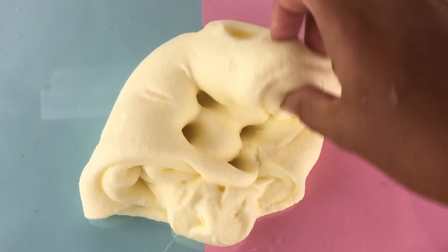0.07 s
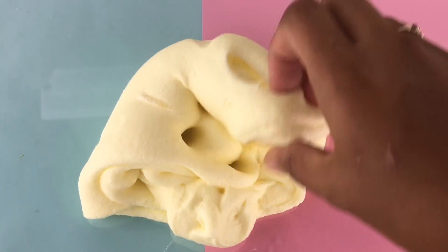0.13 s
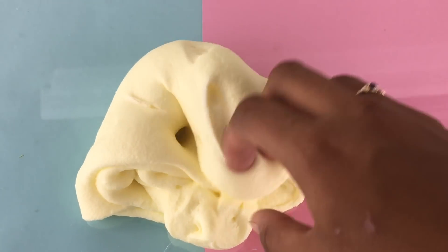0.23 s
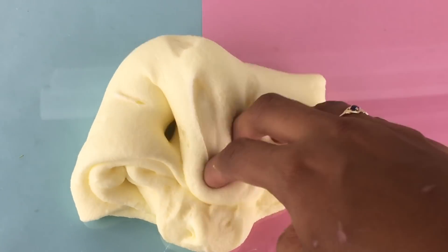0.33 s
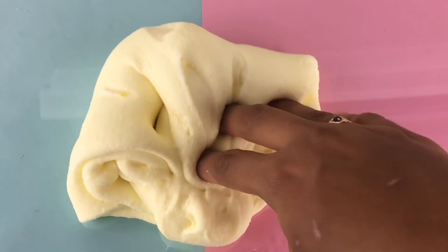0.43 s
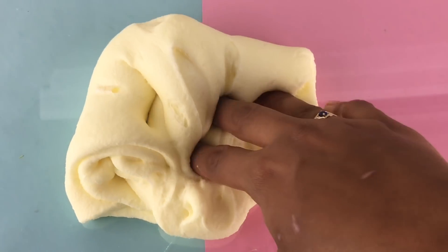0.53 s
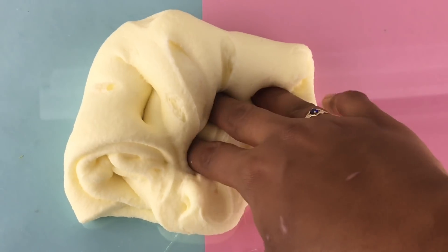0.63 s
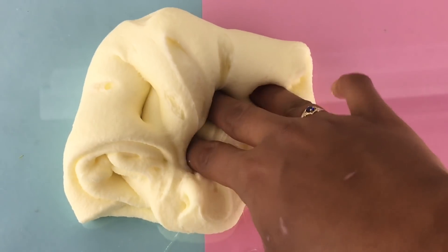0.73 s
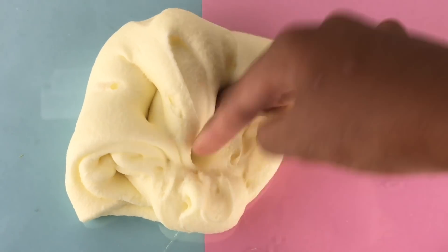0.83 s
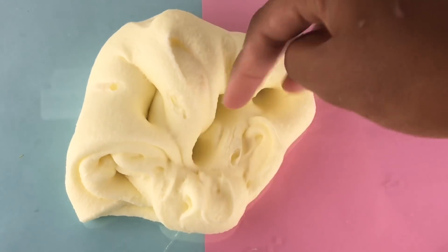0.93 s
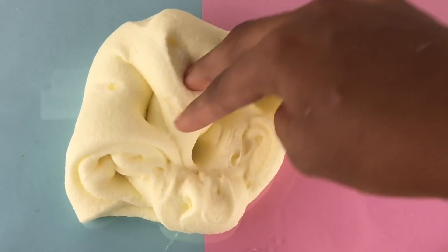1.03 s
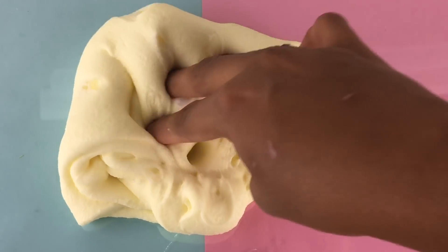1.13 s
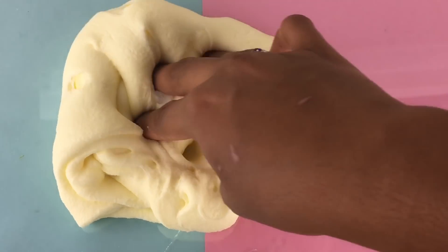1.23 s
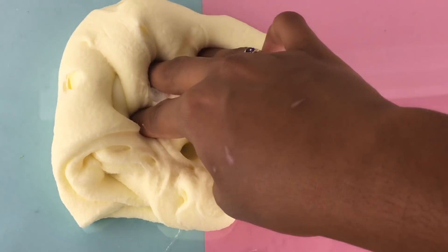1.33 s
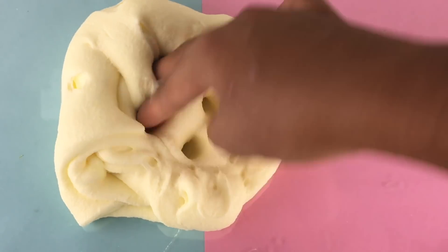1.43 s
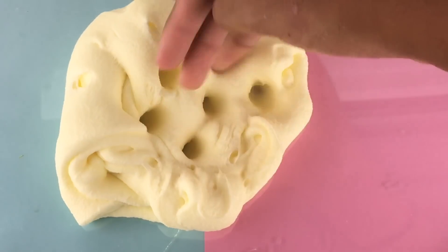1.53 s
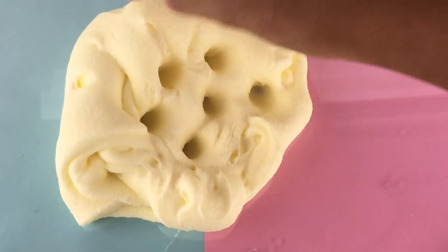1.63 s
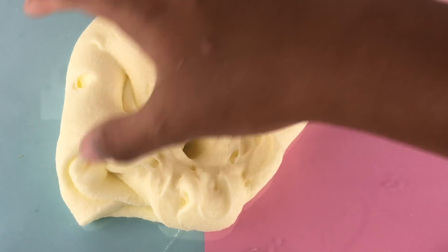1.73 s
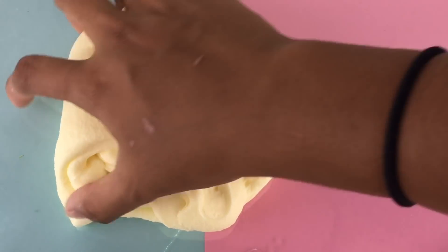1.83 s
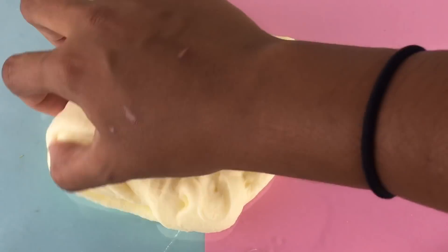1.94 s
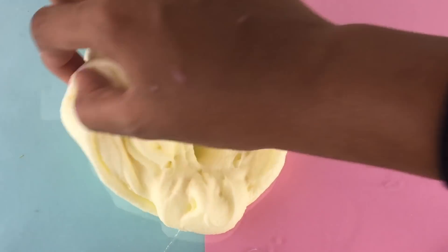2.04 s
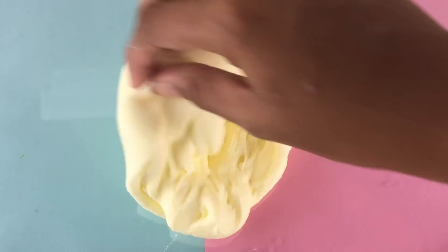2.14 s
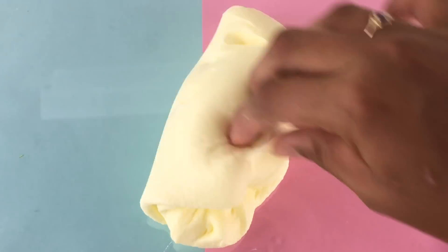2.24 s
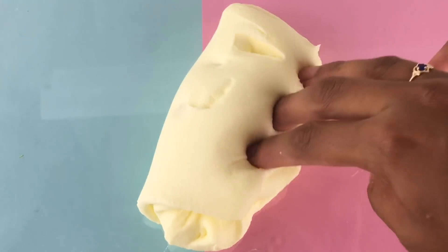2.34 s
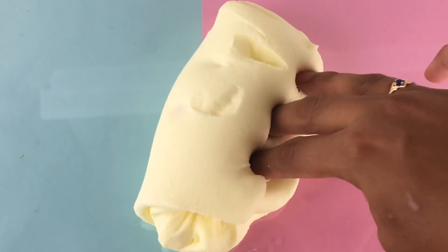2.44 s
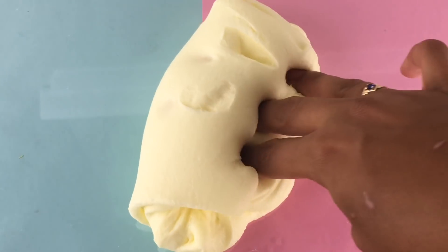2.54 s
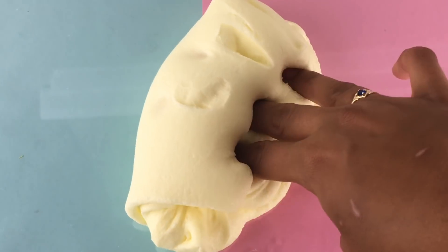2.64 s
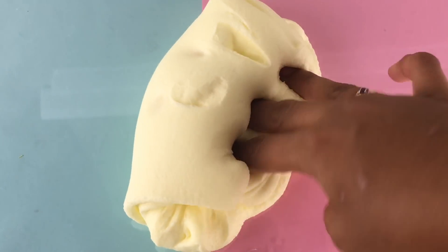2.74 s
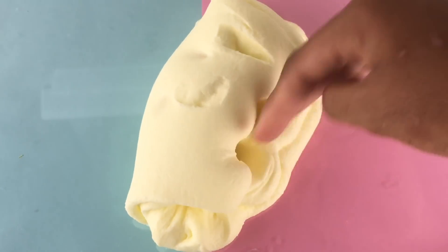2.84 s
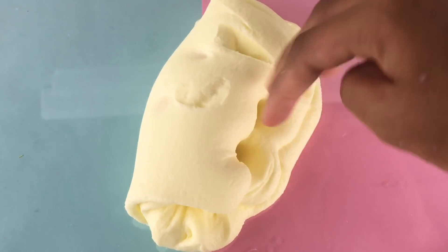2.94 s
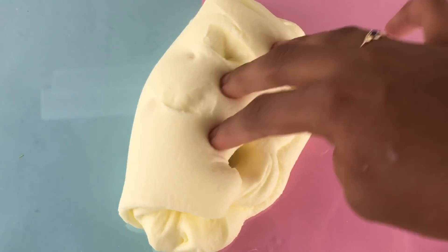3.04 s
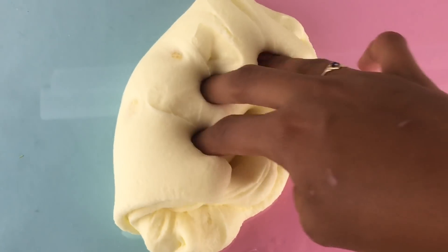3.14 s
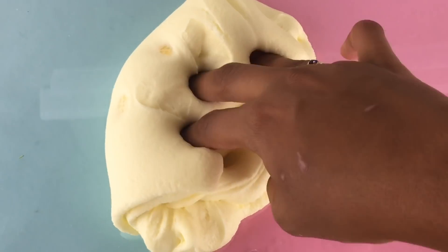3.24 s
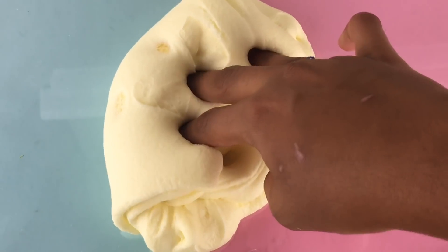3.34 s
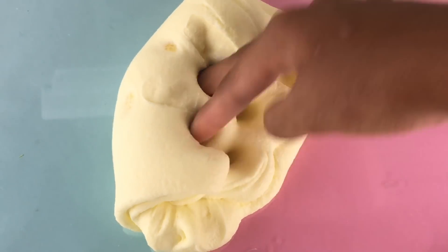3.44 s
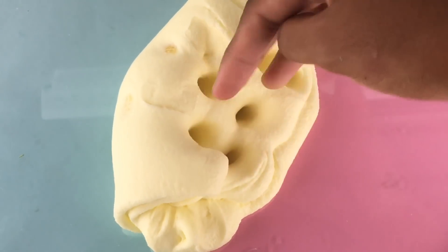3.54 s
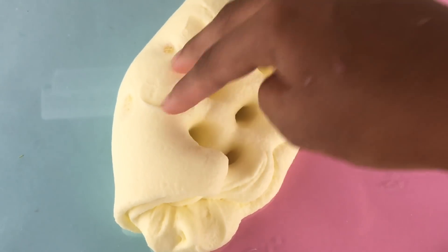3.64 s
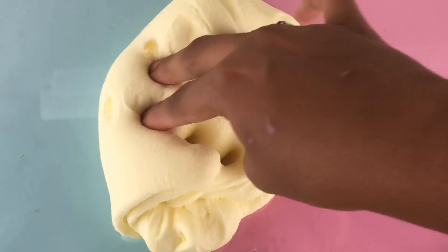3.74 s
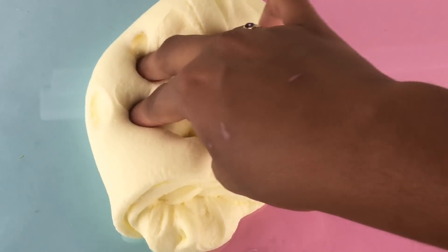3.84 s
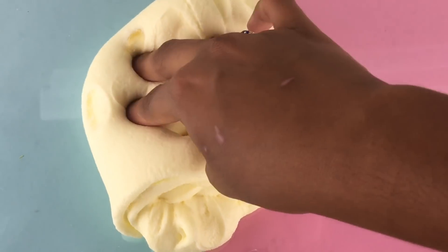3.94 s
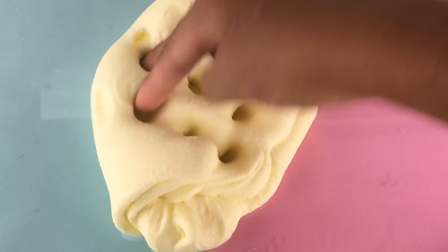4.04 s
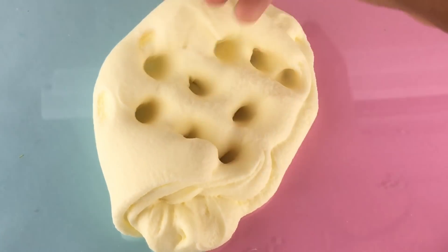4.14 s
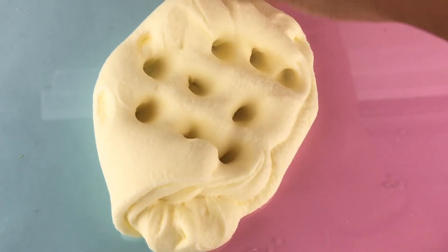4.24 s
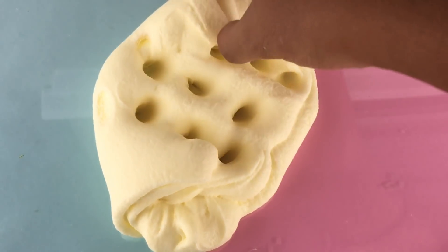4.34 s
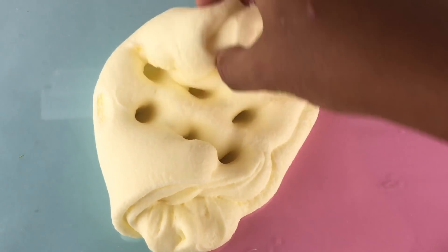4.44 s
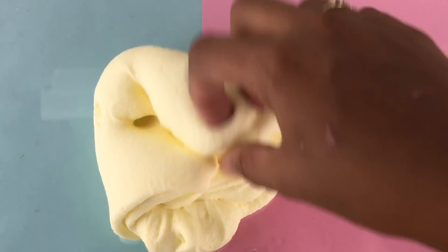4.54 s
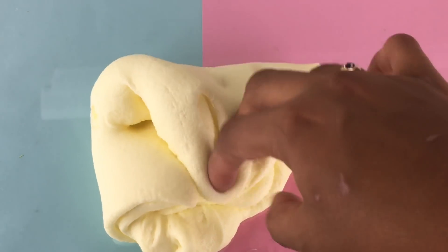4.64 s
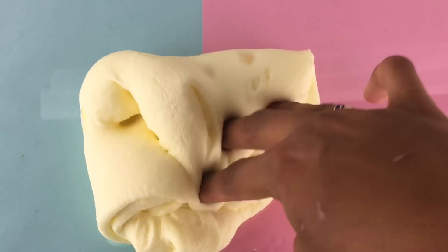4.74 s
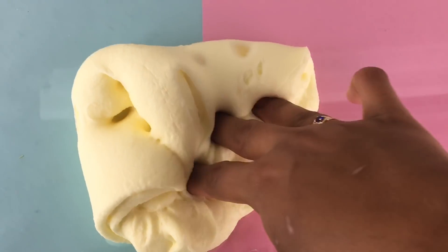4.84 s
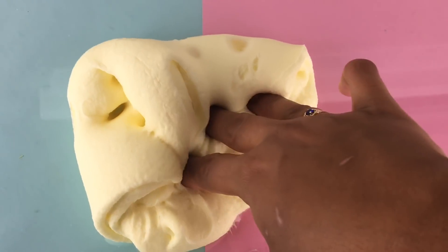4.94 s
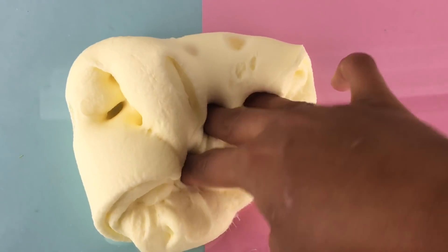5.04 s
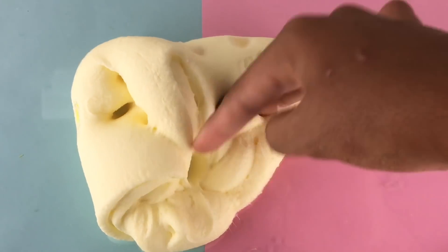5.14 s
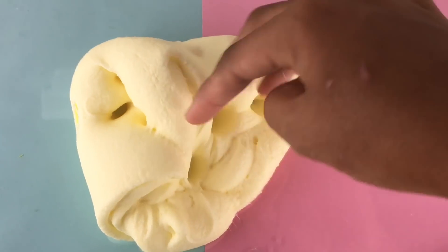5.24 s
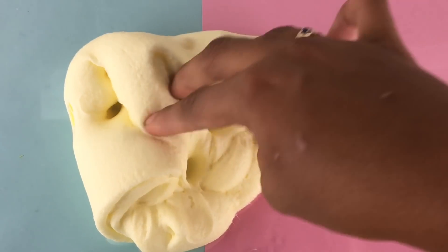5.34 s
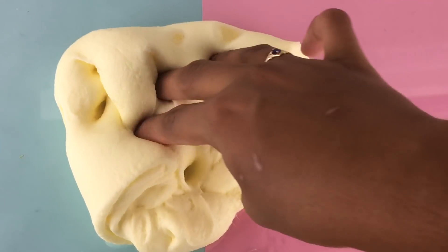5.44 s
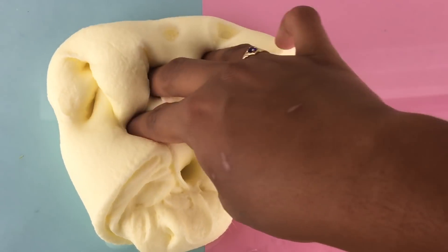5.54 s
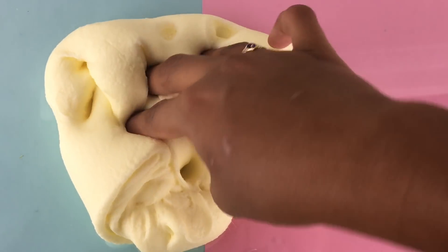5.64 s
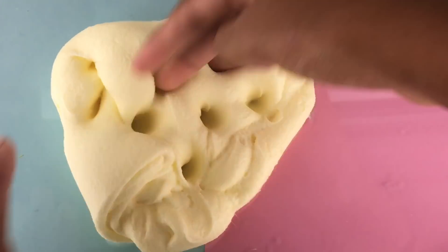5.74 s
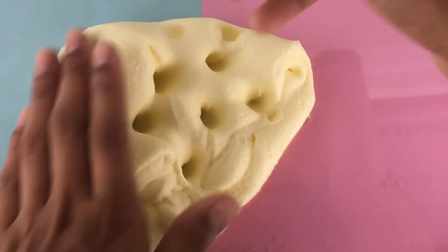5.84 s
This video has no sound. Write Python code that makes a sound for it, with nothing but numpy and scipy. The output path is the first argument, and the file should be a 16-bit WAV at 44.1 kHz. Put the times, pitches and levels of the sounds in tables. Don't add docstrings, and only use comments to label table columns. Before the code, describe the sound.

Close-up slime kneading: sudden loud hollow air-pocket pops, faint crackles, soft thumps on a table and near-quiet gaps between pulls.

```python
import sys
import numpy as np
from scipy import signal
from scipy.fft import rfft, irfft, next_fast_len
from scipy.io import wavfile
from scipy.ndimage import uniform_filter1d, map_coordinates

SR = 44100
rng = np.random.default_rng(int(sys.argv[2]) if len(sys.argv) > 2 else 0)


def gain_from_db(level_db):
    decades = np.asarray(level_db, float) / 20
    return 10 ** decades


def pcm_store(signal):
    levels = np.round(np.clip(np.atleast_2d(signal), -1, 1) * 32767)
    wavfile.write(sys.argv[1], SR, levels.astype(np.int16).T)


N = 259749


def along(points, hz):
    f, v = np.transpose(points)
    return np.interp(np.log(hz + 1), np.log(f + 1), v)


def unit(x):
    return x / np.sqrt(np.mean(x ** 2) + 1e-20)


def shaped(x, spectrum_db):
    m = next_fast_len(N + 8192)
    gain = gain_from_db(along(spectrum_db, np.fft.rfftfreq(m, 1 / SR)))
    return irfft(rfft(x, m) * gain, m)[..., :N]


def coloured(x, spectrum_db):
    return unit(shaped(x, spectrum_db))


def wobble(rate_hz):
    knots = rng.standard_normal(int(N * rate_hz / SR) + 4)
    return map_coordinates(knots, [np.arange(N) * rate_hz / SR])


def patchy(x, depth_db):
    z = signal.stft(x, nperseg=256)[2]
    field = uniform_filter1d(rng.standard_normal(z.shape), size=9, axis=0)
    field = uniform_filter1d(field, size=12, axis=1)
    return signal.istft(z * gain_from_db(depth_db * unit(field)), nperseg=256)[1][:N]


def placed(start_s, rows):
    where = np.round(start_s * SR).astype(int) + np.arange(rows.shape[1])
    return np.bincount(where.ravel(), rows.ravel(), N + SR)[:N]


def rings(start_s, level_db, pitch_hz, fall_ms, cycles, glide, rough):
    t = np.arange(4096) / SR
    swell_s = cycles / pitch_hz
    rise = np.sin(np.pi / 2 * t / swell_s) ** 2
    decay = gain_from_db(-10 * np.abs(1e3 * (t - swell_s) / np.maximum(fall_ms, .5)) ** 0.89)
    shape = np.where(t < swell_s, rise, decay)
    stumble = rough * np.cumsum(rng.standard_normal(shape.shape), axis=1) * np.sqrt(pitch_hz / SR)
    phase = 2 * np.pi * pitch_hz * (t + glide * swell_s * np.exp(-t / swell_s)) + stumble
    return placed(start_s, gain_from_db(level_db) * shape * np.sin(phase))


def spurts(start_s, level_db, centre_hz, width_hz, rise_ms, fall_ms):
    ms = np.arange(2048) * 1000 / SR
    shape = np.where(ms < rise_ms, gain_from_db(13.0 * (ms / rise_ms - 1.0)), gain_from_db(-10 * (ms - rise_ms) / fall_ms))
    hz = np.fft.rfftfreq(2048, 1 / SR)
    damping = 1j * hz * width_hz
    pocket = (damping / (centre_hz ** 2 - hz ** 2 + damping)) ** 2 / (1 + 1j * hz / 13000)
    direct = irfft(rfft(rng.standard_normal(shape.shape) * shape) * pocket)
    around = irfft(pocket)
    size = gain_from_db(level_db) * np.linalg.norm(shape, axis=1, keepdims=True)
    return [placed(start_s, size * v / np.linalg.norm(v, axis=1, keepdims=True)) for v in (direct, around)]


def torn(films):
    start_s, level_db, centre_hz, fall_ms, octaves = np.transpose(films)[..., None]
    fall_ms = np.maximum(fall_ms - .15, .22)
    width_hz = 2.77 * np.maximum(octaves, .08) * centre_hz
    return spurts(start_s, level_db - .6, centre_hz, width_hz, 0.039 + 0.49 * fall_ms, fall_ms)


def answer(x, decays, gap_s):
    out, block = np.zeros(N + 2 * SR), SR // 3
    for start in range(0, N, block):
        sparse = rng.standard_normal(SR // 2) * gain_from_db(2.2 * rng.exponential(size=SR // 2))
        hz, t, z = signal.stft(sparse, SR, nperseg=128)
        tail = signal.istft(z * gain_from_db(-60 * t / along(decays, hz)[:, None]), SR, nperseg=128)[1]
        wet = signal.fftconvolve(x[start:start + block], tail / np.linalg.norm(tail))
        out[start + round(gap_s * SR):][:len(wet)] += wet
    return out[:N]


def air():
    # hz, density_db
    rumble_db = [(10, -7), (25, 4.5), (45, -6), (65, 2.5), (95, -15.5), (140, -2.5), (250, -19.5),
                 (400, -38)]
    # hz, density_db
    hiss_db = [(120, -29.5), (200, -4.5), (513, -9.5), (542, -11.5), (1580, -15.5), (10600, -21),
               (15600, -27.5), (16500, -37.5)]
    rumble = gain_from_db(-66 + 1.7 * wobble(9.2)) * coloured(rng.standard_normal(N), rumble_db)
    return rumble + gain_from_db(-69.5) * coloured(rng.standard_normal(N), hiss_db)


def far_echoes():
    # start_s, energy_db, centre_hz, width_over_centre
    puffs = [(1.2167, -6.5, 2950, 0.46), (1.535, -1, 1380, 0.93), (1.5722, -28, 1800, 1.3),
             (3.129, -16.5, 2580, 0.81), (3.129, -17, 10000, 0.87), (2.8459, -3, 4200, 0.53),
             (2.8764, -11, 9000, 0.82), (3.4748, 8, 4600, 1.07), (3.5084, 4, 4000, 1.5),
             (4.08, 3.5, 3930, 6.5), (5.1305, -8, 4300, 0.99), (5.3887, -9, 13000, 0.77),
             (5.4765, -18, 12680, 0.56), (5.769, 8, 8800, 0.96)]
    # hz, t60_s
    walls = [(500, 0.59), (1500, 0.4), (3000, .4), (6000, .36), (12000, 0.31)]
    start_s, energy_db, centre_hz, spread = np.transpose(puffs)[..., None]
    puff = spurts(start_s, energy_db, centre_hz, spread * centre_hz, .05 + 0 * start_s, .05)[1]
    return answer(puff, walls, gap_s=0.0057)


def table(x):
    # pitch_hz, level_db, t60_s
    modes = [(182, -0.5, 0.29), (414, -8, 0.71), (526, -14.5, 0.3), (637, -15, 0.48), (1424, -12, 0.35),
             (2060, -12.5, 0.31)]
    t = np.arange(SR // 2) / SR
    tones = 0
    for hz, db, t60_s in modes:
        tones = tones + gain_from_db(db - 60 * t / np.clip(t60_s, .1, .45)) * np.sin(2 * np.pi * hz * t)
    return gain_from_db(-30.5) * signal.fftconvolve(x, tones / np.linalg.norm(tones))[:N]


def thumps():
    # start_s, peak_db, pitch_hz, fall_ms per 10 dB
    pushes = [(0.8493, -25.5, 140, 6.5), (0.9, -33.5, 161, -1), (1.212, -41.5, 189, 4),
              (1.49, -31, 200, 4.5), (1.504, -39, 179, 11), (1.472, -42, 150, 2.5), (1.518, -32, 187.4, 2),
              (1.595, -41, 74.5, -2), (1.922, -25, 290, 3), (1.924, -37.5, 119, 11),
              (2.8199, -27.5, 170, 2.5), (2.8412, -32.5, 120, 2), (2.8738, -29.5, 182, 2.5),
              (3.126, -36, 171, 2.5), (3.471, -42, 148.8, 23), (3.502, -33, 151.7, 10),
              (4.092, -35, 200, 3.5), (4.1178, -27, 146.5, 1.5), (4.145, -51, 57, 51),
              (4.2134, -44.5, 114, 14.5), (4.3272, -26.5, 201, 4.5), (4.3322, -24.5, 184, 2.5),
              (4.352, -38, 180, 11), (4.603, -51.5, 57, 19.5), (5.127, -31.5, 127.5, 9),
              (5.2153, -34, 127, 3.5), (5.743, -42, 163, 32.5), (5.7618, -43.5, 227, 28),
              (5.841, -40, 55, 17), (1.948, -51, 107, 12), (0.858, -43.5, 45, 25), (2.831, -45, 38.4, 30),
              (3.51, -45, 35.5, 33), (4.088, -38.5, 38, 23), (4.332, -46.5, 35.5, 29.5),
              (5.136, -46, 36, 27), (5.773, -46, 45, 23)]
    start_s, level_db, pitch_hz, fall_ms = np.transpose(pushes)[..., None]
    return rings(start_s + .002, level_db + 3.0, pitch_hz, fall_ms, cycles=.5, glide=-0.25, rough=0.45)


def stickiness():
    # let_go_s, fizz_db, squelch_db
    pulls = [
        (0.848, -39, -44),
        (1.487, -52.5, -54.5),
        (2.823, -40.5, -51),
        (3.468, -49.5, -54),
        (4.073, -53.5, -57.5),
        (4.612, -43, -55.5),
        (5.128, -47, -58),
        (5.739, -47, -53),
    ]
    # start_s, hold_s, fizz_db, squelch_db
    strokes = [(-.01, 0.21, -61, -67), (0.406, 0.046, -63, -68), (0.447, 0.041, -56.5, -63.5),
               (1.523, 0.065, -49, -46), (1.613, 0.015, -56, -53), (1.955, .13, -49.5, -57),
               (1.994, 0.0036, -42.5, -60), (2.096, 0.043, -55.5, -62.5), (2.263, 0.04, -57, -69),
               (2.168, 0.051, -68, -65), (4.63, .12, -66, -71.5), (4.804, .05, -67.5, -77),
               (4.41, 0.035, -53, -61), (4.472, 0.11, -56.5, -65.5), (4.869, 0.13, -58.5, -69),
               (0.137, 0.024, -64, -70), (4.921, 0.022, -55.5, -65.5)]
    stretch_db_per_s, let_go_db_per_s = 678.5, 3503
    swell_db_per_s, fade_db_per_s = 437, 477
    rest_fizz_db, rest_squelch_db = -73, -75.5
    t = np.arange(N) / SR
    level_db = np.outer([rest_fizz_db, rest_squelch_db], np.ones(N))
    moves = [(s, 0, tops_db, stretch_db_per_s, let_go_db_per_s) for s, *tops_db in pulls]
    moves += [(s, hold_s, tops_db, swell_db_per_s, fade_db_per_s) for s, hold_s, *tops_db in strokes]
    for s, hold_s, tops_db, rise, fall in moves:
        below_db = rise * np.maximum(s - t, 0) + fall * np.maximum(t - s - hold_s, 0)
        level_db = np.maximum(level_db, np.array(tops_db)[:, None] - below_db)
    return level_db


def peeling():
    # hz, density_db
    fizz_spectrum = [(1470, -38), (2500, -12), (7430, -8.5), (9200, -6.5), (15100, -0.5), (16100, -4.5),
                     (16500, -28)]
    # hz, density_db
    squelch_spectrum = [(200, -22), (500, 1.5), (900, 2.5), (2000, -6.5), (4000, -8.5), (6500, -35)]
    spits_per_s, spit_db = 400, -12
    fizz_db, squelch_db = stickiness()
    clumps_db = 0.85 * wobble(45) + 1.3 * wobble(300)
    snaps = rng.standard_normal((2, N)) * gain_from_db(1.3 * rng.exponential(size=(2, N)))
    fizz = unit(gain_from_db(clumps_db) * coloured(patchy(snaps[0], depth_db=3.0), fizz_spectrum))
    wet = coloured(patchy(snaps[1], depth_db=1.2), squelch_spectrum)
    squelch = unit(gain_from_db(clumps_db + 3.5 * wobble(25)) * wet)
    spits = (rng.random(N) < spits_per_s / SR) * rng.standard_normal(N)
    fizz = fizz + gain_from_db(spit_db) * coloured(spits, fizz_spectrum)
    return gain_from_db(fizz_db - 1.5) * fizz + gain_from_db(squelch_db + 1.5) * squelch


def slaps():
    # start_s, rms_db, centre_hz, fall_ms per 10 dB
    hits = [
        (1.2166, -25.5, 3060, 1.5),
        (1.2163, -37, 2780, 8.5),
        (3.128, -42, 2660, 6),
        (3.817, -43, 3160, -0.3),
        (4.3351, -39.5, 3410, 0.5),
    ]
    return torn([(*row, .17) for row in hits])


def overtones():
    # start_s, peak_db, pitch_hz, fall_ms per 10 dB
    modes = [(0.8529, -14.5, 1380, 0.5), (0.8532, -13.5, 2180, 1), (.8536, -28, 3500, 4),
             (.8565, -28, 5500, 3), (0.8702, -28.5, 1437, 1), (0.8876, -36, 1604, 4),
             (1.2167, -24, 3450, 7), (1.218, -29.5, 2750, 5), (.1085, -37, 2300, 0), (.1985, -50, 566, 3.5),
             (.4595, -49, 3600, 7), (4.0835, -24.5, 804, 0.5), (5.132, -25.5, 950, 4.5),
             (5.8425, -43, 1690, -2), (1.526, -24, 1431, -1), (1.5255, -32, 735, 13),
             (1.5345, -20.5, 1200, 8), (1.5346, -22.5, 1507, 7.5), (1.572, -26.5, 1446, 6),
             (1.581, -26.5, 525, 2.5), (1.581, -28.5, 853, 5), (1.584, -31, 1598, 1.5),
             (2.8261, -33, 5430, 11), (2.846, -23, 1016, 3.5), (2.844, -22, 4830, 5),
             (2.8772, -35, 3563, 2), (3.1285, -36.5, 1100, 3), (3.129, -37, 2950, 4), (3.475, -17, 1983, 6),
             (3.474, -21, 1450, 4.5), (3.475, -16.5, 4500, 2.5), (3.5057, -15.5, 970, 5),
             (3.507, -16, 3830, 4), (4.0795, -14.5, 1466, 3), (4.0797, -14, 3470, 2),
             (4.0798, -7.5, 6740, 0.6), (5.131, -18, 1236, 3), (5.131, -18, 1620, 3),
             (5.1306, -18.5, 4470, -2.5), (5.156, -18, 1900, 1.5), (5.1558, -18.5, 4740, 1.5),
             (5.178, -28.5, 965, 4), (5.178, -18, 1460, 0), (5.178, -21, 3770, 1.5),
             (5.7477, -17, 1088, 4.5), (5.7477, -12.5, 1690, 2.5), (5.7469, -10, 3150, 1)]
    start_s, level_db, pitch_hz, fall_ms = np.transpose(modes)[..., None]
    fall_ms = np.minimum(fall_ms, 6000 / pitch_hz + .6)
    return rings(start_s - .0002, level_db, pitch_hz, fall_ms, cycles=.8, glide=0, rough=.2)


def holes():
    # start_s, ring_peak_db, pitch_hz, smack_rms_db
    snapped = [(.1067, -47, 607, -51), (.3427, -53, 617, -56), (.8522, -9, 536.7, -21.5),
               (.8837, -30, 603, -37), (1.4901, -28.5, 424, -59), (1.5029, -42, 472, -39),
               (1.5144, -27.5, 447, -39), (2.128, -50.5, 838, -50), (3.2335, -56, 1124, -63.5),
               (5.4765, -57, 900, -52.5), (2.2256, -49, 697, -62), (2.3429, -34.5, 501, -35),
               (2.498, -42.5, 706, -54), (2.8237, -12, 552, -20), (2.8442, -20.5, 520, -23.5),
               (3.1286, -31.5, 674, -40.5), (3.2232, -51, 636, -54), (3.8143, -28.5, 567, -39),
               (4.1598, -36, 910, -62.5), (4.6083, -45.5, 560, -49), (4.6195, -42.5, 1197, -46),
               (4.8532, -40, 656, -53), (5.1303, -12, 560, -31), (5.2167, -30, 449, -37),
               (5.388, -42, 688, -49), (5.746, -16, 500, -20), (5.777, -16.5, 1520, -38),
               (5.7803, -18.5, 650, -27), (5.841, -24, 670, -33.5)]
    # start_s, ring_peak_db, pitch_hz, smack_rms_db
    opened = [(.22, -48.5, 975, -58.5), (1.2161, -42, 1176, -31), (1.2163, -38, 640, -56),
              (1.5324, -16.5, 592, -29.5), (1.9245, -50.5, 590, -81), (1.9235, -37.5, 810, -61),
              (2.167, -46.5, 743, -44.5), (3.1383, -46, 1110, -51.5), (3.4752, -9.5, 657, -24),
              (3.5009, -28, 780, -30), (3.5058, -14.5, 539, -28), (4.0797, -17, 598, -25),
              (4.0932, -21.5, 845, -39), (4.169, -38, 897, -49), (4.3291, -35.5, 385, -46),
              (4.4179, -46.5, 1052, -54), (5.1544, -31.5, 759, -32), (5.77, -23, 780, -24.5)]
    # start_s, ring_peak_db, pitch_hz, smack_rms_db
    gulped = [(.8663, -30.5, 617, -36), (.8988, -44, 440, -46.5), (1.472, -53, 537, -76),
              (1.5435, -29.5, 1174, -44), (1.5779, -34, 1440, -39), (1.935, -39, 384, -67),
              (2.03, -54, 576, -75), (2.06, -60, 690, -75), (2.3026, -50.5, 466, -60.5),
              (2.8756, -29.5, 367, -41.5), (3.5335, -44, 626, -39), (4.1188, -35.5, 725, -46),
              (5.1768, -30, 493, -33)]
    kinds = ((snapped, 1.7), (opened, 4.8), (gulped, 12))
    events = [(*row, fall_ms) for rows, fall_ms in kinds for row in rows]
    start_s, ring_db, pitch_hz, smack_db, fall_ms = np.transpose(events)[..., None]
    smack_fall_ms = 0.37 + 1.0 * np.abs(fall_ms)
    smack = spurts(start_s + .0004, smack_db + 0.5, 650 + 1.1 * pitch_hz, 1600, 0.3, smack_fall_ms)
    ring = rings(start_s + 0.00084, ring_db + 1.0, pitch_hz, .8 * fall_ms, cycles=1.27, glide=-0.051, rough=0.17)
    return smack, signal.lfilter(*signal.butter(2, 260, "high", fs=SR), ring)


def cracks():
    # start_s, rms_db, centre_hz, fall_ms per 10 dB
    tears = [(.8523, -43, 6150, 6), (.8537, -5, 8600, 0.8), (.8672, -18, 6200, 2), (1.2162, -29, 9000, 0.1),
             (1.524, -25, 4500, 1), (1.528, -25.5, 3970, 1), (1.5338, -32, 2770, 8.5),
             (1.5449, -25.5, 3880, 0.5), (1.568, -29, 9100, 12), (1.5716, -28, 8000, 1),
             (1.5732, -22, 9000, 1), (1.5755, -16, 7600, 0), (1.5776, -26, 4960, 3), (1.9244, -31, 4770, 1),
             (2.1688, -43, 5240, 2.5), (2.4988, -48.5, 3110, 0.5), (2.8761, -29, 7270, 4),
             (3.13, -36, 4600, 1.5), (3.4746, -1, 6000, 0.3), (3.5032, -23, 6000, 2.5),
             (3.5062, -20, 4240, 7.5), (4.0804, -15, 5000, 3), (4.0893, -38, 5200, -1.5),
             (4.123, -36.5, 5450, 9), (5.1306, -11.5, 8500, 1.3), (5.1745, -23.5, 4980, 7),
             (5.1772, -30, 5950, 1), (5.1788, -20, 5900, -0.2), (5.189, -35, 5430, 9.5),
             (5.219, -34.5, 10400, 4), (5.3874, -50, 9000, -2), (5.3883, -31.5, 13630, 2),
             (3.136, -43, 10000, 3), (5.7471, -13.5, 7100, 3), (5.7484, -29, 12050, -1),
             (5.7705, -2.5, 7600, 1.5), (5.7781, -14.5, 5450, 2.5)]
    # start_s, rms_db, centre_hz, fall_ms per 10 dB
    pockets = [(.1082, -39.5, 4570, 0.2), (.4605, -51, 6500, 1), (.48, -60, 5000, 5),
               (.2204, -52.5, 8940, 4), (.2513, -45, 6460, 0.7), (4.6995, -51, 4000, 0.5),
               (.5003, -51, 11000, 1), (1.1818, -58, 12630, 2), (.3968, -61, 12400, 6),
               (.8276, -30, 10800, 0), (.8868, -24, 9800, 1.5), (1.476, -44.5, 12950, 34),
               (1.4912, -34, 7450, 2), (1.954, -57, 10900, 3.5), (2.0736, -60, 11000, -0.5),
               (2.3438, -31.5, 4570, 1), (2.4431, -60.5, 10800, 4.5), (2.8247, -9, 5930, 0.17),
               (2.8457, -16, 4500, 1.5), (3.2776, -44, 11200, -0.7), (3.3095, -61, 4960, 2.5),
               (1.104, -51, 13000, -1), (1.112, -55.5, 13030, -0.5), (1.136, -56.5, 11640, .5),
               (5.032, -57, 11300, 3), (5.379, -59, 11940, 3), (5.651, -59, 13600, -3.5),
               (3.4759, -2.5, 7550, 0.8), (4.6202, -33, 5370, 1), (4.7106, -59, 12550, 3.5),
               (4.7571, -41.5, 9560, 0.5), (4.8651, -51.5, 13400, 1.5), (4.9909, -50.5, 12200, -0.5),
               (5.1557, -15.5, 5300, 0.4), (5.3615, -56, 12750, 1), (5.4765, -36.5, 11800, 3),
               (5.7198, -43.5, 12200, 8.5), (5.7926, -30, 7800, 4)]
    # start_s, rms_db, centre_hz
    ticks = [(0.1466, -32, 13300), (.1973, -42, 11500), (0.2696, -39, 10900), (0.2749, -33, 9400),
             (0.3023, -45, 11600), (.3167, -43, 10200), (0.3433, -36, 6710), (.3635, -45, 11100),
             (0.3722, -29.5, 12700), (.4109, -35, 12500), (.4612, -61, 10700), (0.4737, -40, 12600),
             (0.5195, -36.5, 7000), (0.565, -45, 10100), (1.8867, -37.5, 13100), (1.9037, -40, 12000),
             (1.9906, -27, 11400), (1.997, -26, 8000), (2.129, -37, 8600), (2.5445, -42.5, 7330),
             (3.2247, -32.5, 8830), (3.262, -41.5, 14500), (3.291, -50, 14000), (5.49, -50, 11000),
             (2.662, -52, 7500), (3.7252, -39, 13760), (4.0718, -25.5, 11740), (4.5753, -45.5, 11600),
             (4.6138, -42, 9900), (4.6874, -32, 10800), (4.745, -39, 11400), (4.916, -40, 9500),
             (4.962, -34, 12560)]
    kinds = ((tears, 0.92), (pockets, 0.41))
    films = [(*row, octaves) for rows, octaves in kinds for row in rows]
    tick_fall_ms, tick_octaves, wider_per_octave = 0.17, 0.29, 1
    for s, db, hz in ticks:
        films.append((s, db, hz, tick_fall_ms, tick_octaves + wider_per_octave * np.log2(12000 / hz)))
    return torn(films)


def spikes():
    # start_s, peak_db, centre_hz, table_echo_ms
    bursts = [(.8535, 1, 6500, .3), (.86865, -11, 5500, .2), (.8866, -11, 9000, .145),
              (2.8246, -4, 5800, .18), (2.8456, -8, 5200, .22), (2.8764, -19, 8500, .3),
              (3.4745, 0, 5000, .4), (3.5086, -10, 3700, .28), (4.08005, 1, 5800, .47),
              (5.13055, -4, 5200, .22), (5.1557, -7, 4700, .42), (5.74685, 1, 7500, .5),
              (5.7705, -1, 7000, .42)]
    # start_s, peak_db, centre_hz, table_echo_ms
    sucks = [
        (1.2156, -25.5, 2400, 0.287),
        (1.96, -32, 3400, 0.65),
        (2.3433, -31.5, 3300, 0.33),
        (4.2, -32, 2700, 0.37),
        (2.32, -58, 3500, .3),
        (4.831, -61, 2500, .5),
        (4.845, -57, 14000, .07),
        (4.972, -57, 10000, .1),
        (4.567, -52, 1700, .5),
    ]
    table_echo_db = -2.5
    start_s, peak_db, centre_hz, echo_ms = np.transpose(bursts + sucks)[..., None]
    sign = np.repeat([1, -1], [len(bursts), len(sucks)])[:, None]
    hz = np.fft.rfftfreq(512, 1 / SR)
    damping = 1j * hz * (.8 * centre_hz)
    opening = damping / (centre_hz ** 2 - hz ** 2 + damping) / (1 + 1j * hz / 14000)
    once = irfft(opening)
    size = sign * gain_from_db(peak_db) / once.max(axis=1, keepdims=True)
    echo = gain_from_db(table_echo_db) * np.exp(-2j * np.pi * hz * (echo_ms / 1000 % .005))
    twice = irfft(opening * (1 + echo))
    return placed(start_s, size * twice), placed(start_s, size * once)


def scene():
    # hz, t60_s
    near_decay = [(200, 0.33), (1000, 0.086), (5000, 0.05), (14000, 0.055)]
    # hz, t60_s
    room_decay = [(100, 1), (500, 0.21), (1300, 0.42), (4000, 0.28), (8000, 0.25), (15000, 0.4)]
    crack, crack_around = cracks()
    smack, smack_around, ring = *holes()[0], None
    (smack, smack_around), ring = holes()
    thump = thumps()
    spike, spike_once = spikes()
    slap, slap_around = slaps()
    ring = ring + overtones()
    near = gain_from_db(-8) * (crack_around + slap_around) + gain_from_db(-16) * spike_once
    near = near + gain_from_db(-12.0) * smack_around + gain_from_db(-16.0) * ring + gain_from_db(-16.5) * thump
    far = gain_from_db(-16) * spike_once + gain_from_db(-16.5) * crack_around
    far = far + gain_from_db(-16.0) * smack_around + gain_from_db(-16.5) * ring + gain_from_db(-19) * thump
    late = answer(far, room_decay, gap_s=.006) + gain_from_db(-14.5) * far_echoes()
    room = answer(near, near_decay, gap_s=0.0013) + patchy(late, depth_db=1.1)
    slime = spike + slap + crack + smack + ring + thump + peeling()
    return (slime + room + table(ring + smack + thump) + air())[None]


def band_limit(x):
    return signal.sosfilt(signal.butter(12, 16970, fs=SR, output="sos"), x)


def record(dry):
    # hz, gain_db
    phone_db = [(20, 0), (15800, 0), (15950, -26), (16900, -32), (17000, -140)]
    limited = dry / (1 + np.abs(dry / .88) ** 8) ** (1 / 8)
    return band_limit(1.001 * shaped(limited, phone_db))


dry = scene()
out = record(dry)
pcm_store(out)
```